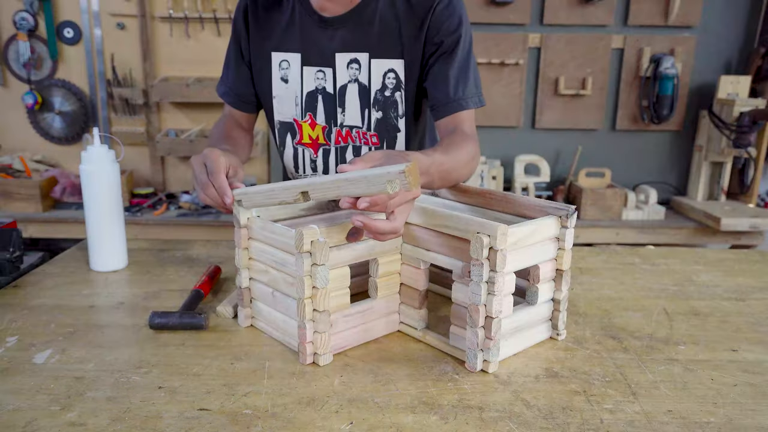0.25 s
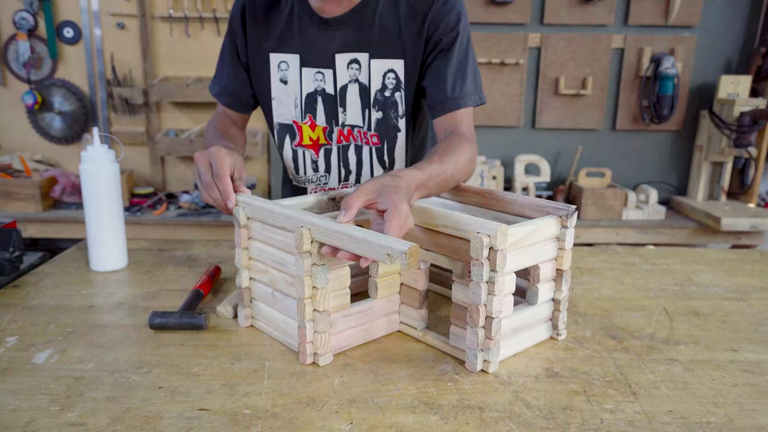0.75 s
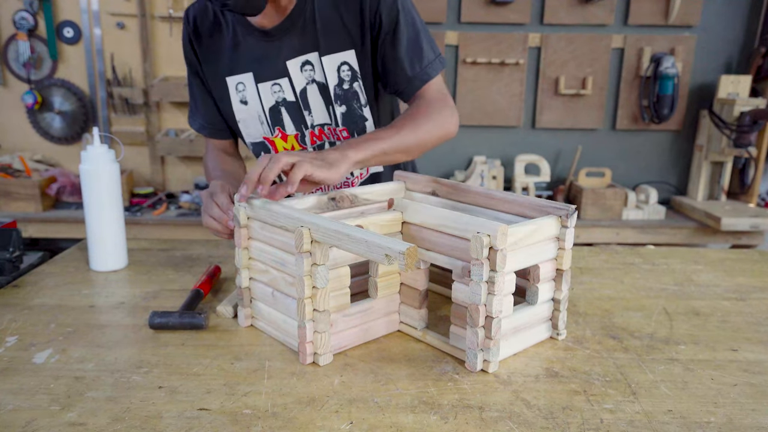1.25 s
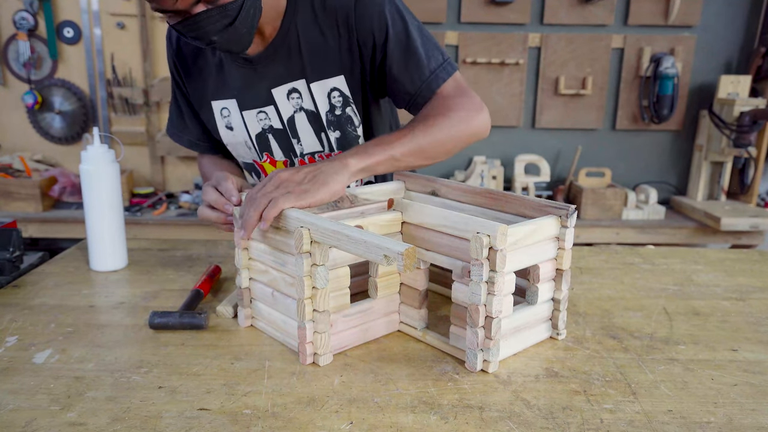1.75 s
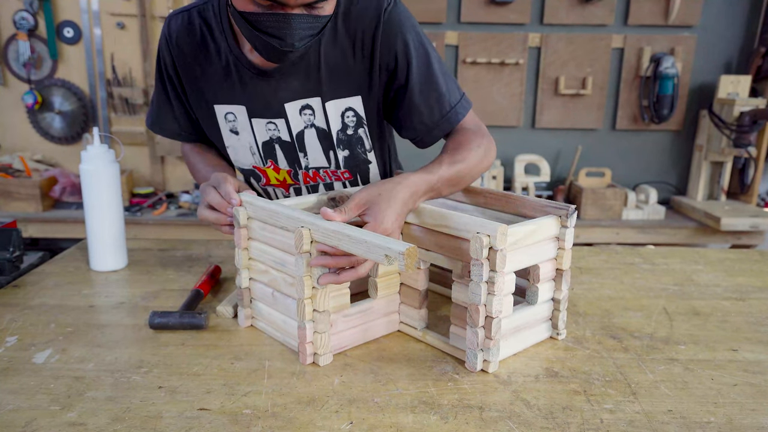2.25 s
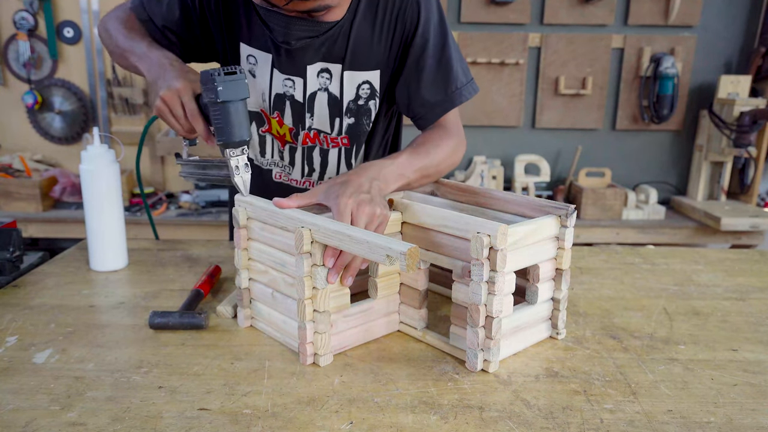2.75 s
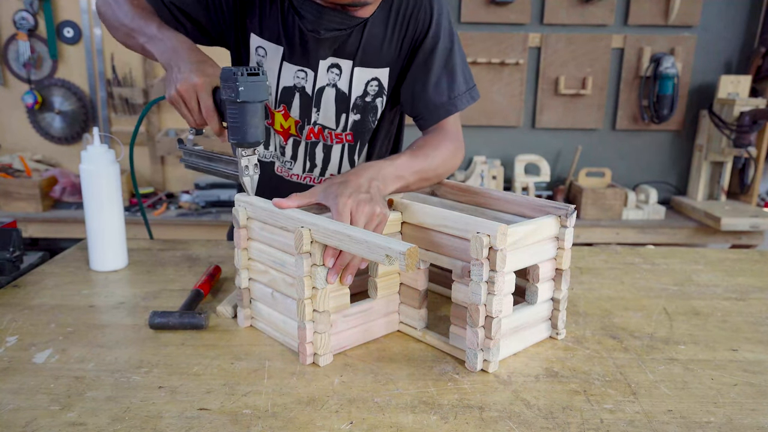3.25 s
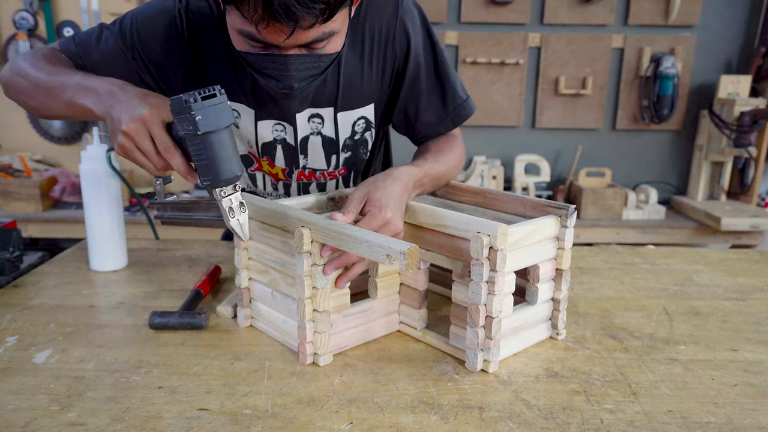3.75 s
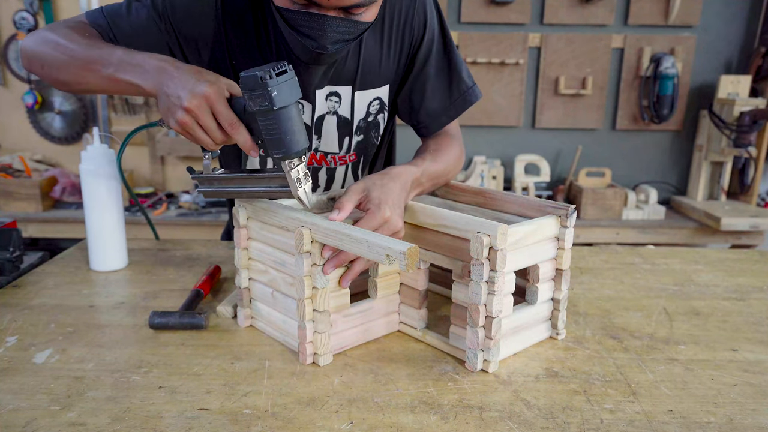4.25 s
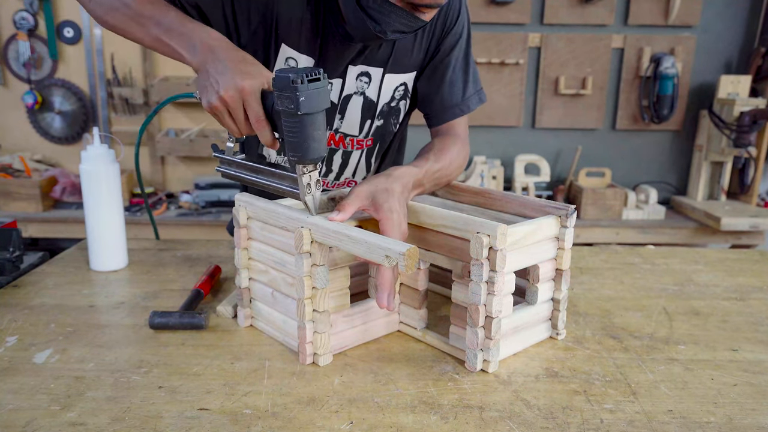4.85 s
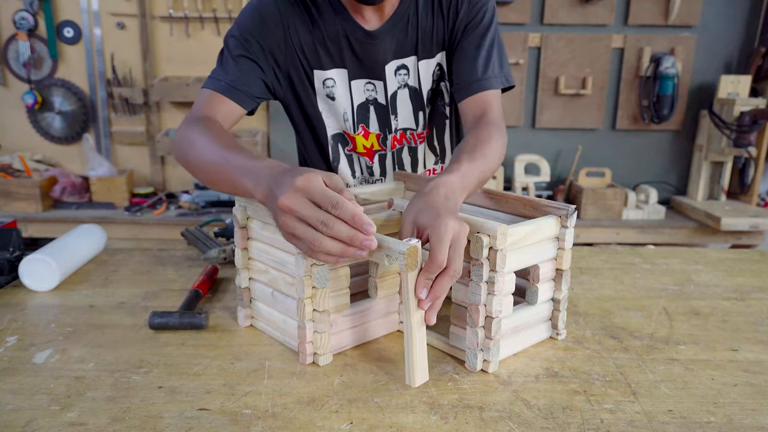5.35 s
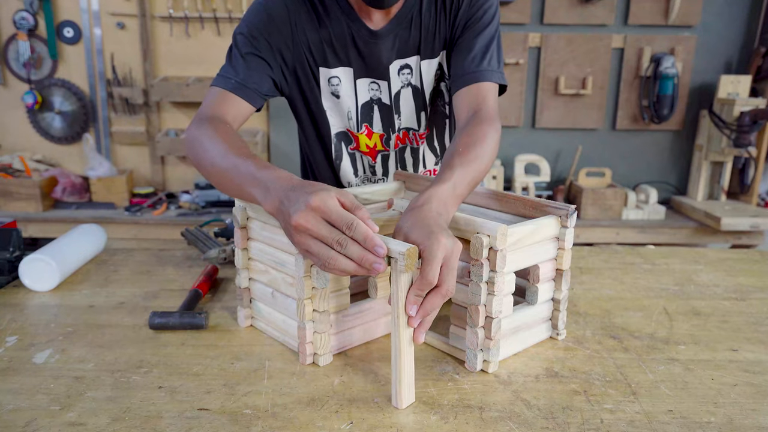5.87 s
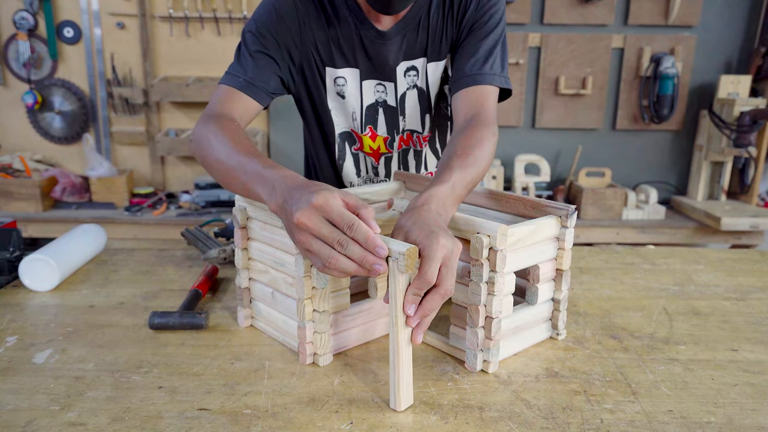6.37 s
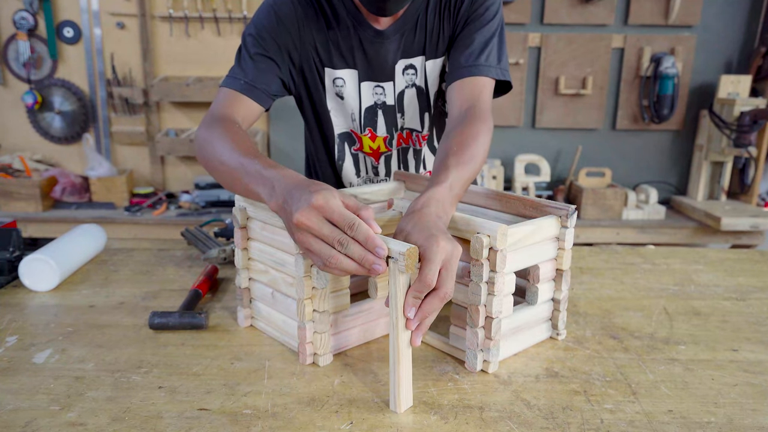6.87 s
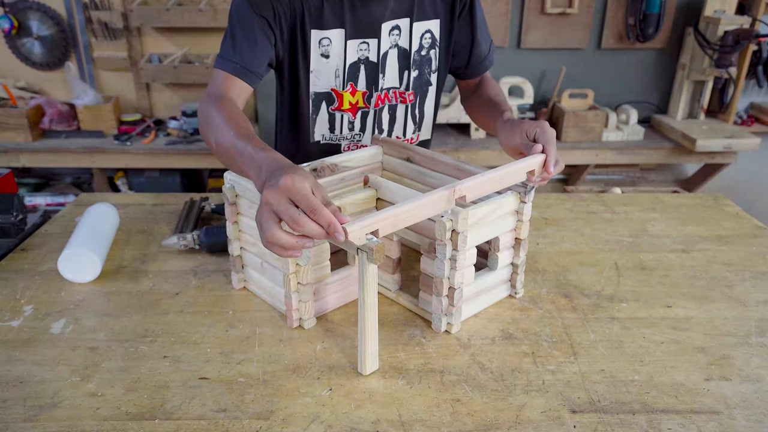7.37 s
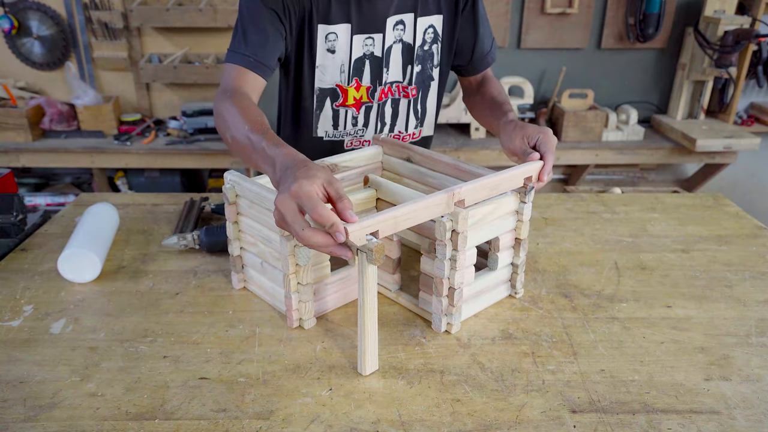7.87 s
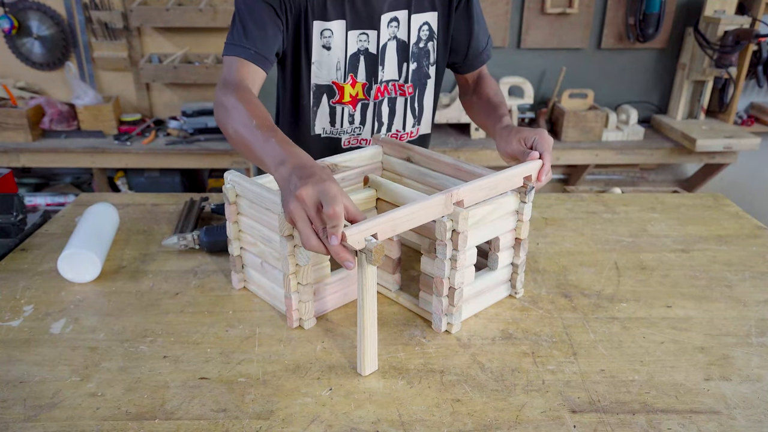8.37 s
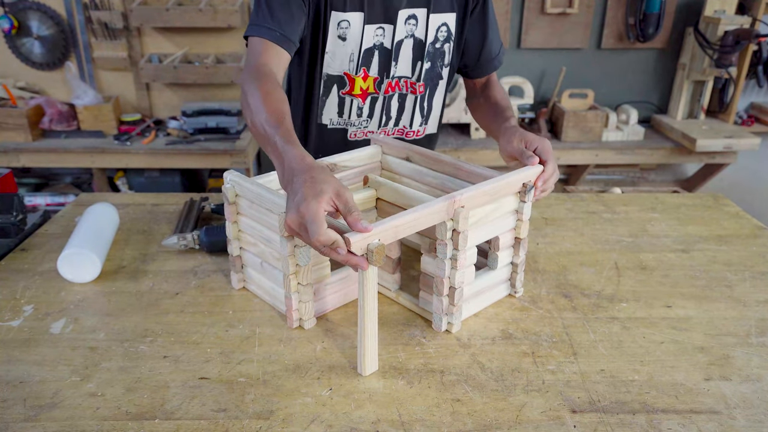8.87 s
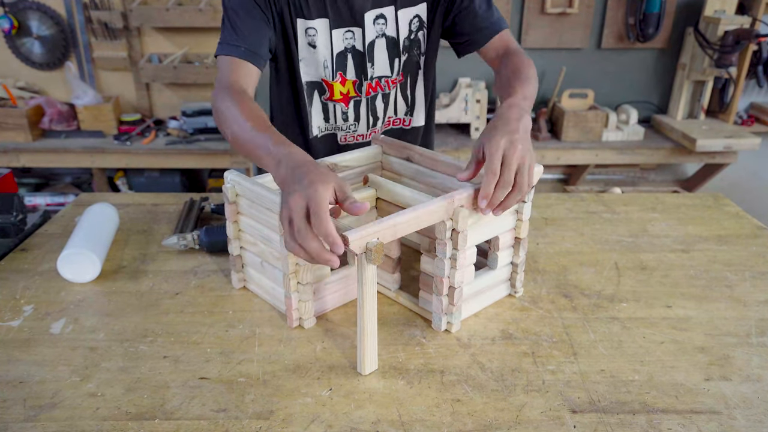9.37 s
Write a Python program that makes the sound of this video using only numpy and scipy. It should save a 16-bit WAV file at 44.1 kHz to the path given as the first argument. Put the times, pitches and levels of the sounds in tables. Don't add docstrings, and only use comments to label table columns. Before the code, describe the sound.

A steady airy machine drone with mains buzz fills a small hard workshop. Wooden sticks tap and rub, and a tight log whistles briefly. An air nailer cracks twice with bursts of air, then twice more until an abrupt scene change. Afterwards come a hard knock, a chattering dropped tool and dry sliding wood. Close, thin-sounding stereo microphone, with the drone dipping after each shot.

```python
import sys
import numpy as np
from scipy import signal
from scipy.fft import rfft, irfft, next_fast_len
from scipy.io import wavfile
from scipy.ndimage import uniform_filter1d, map_coordinates

SR = 44100
rng = np.random.default_rng(int(sys.argv[2]) if len(sys.argv) > 2 else 0)


def file_out(sig):
    cols = np.atleast_2d(sig).T
    lim = np.clip(cols, -1, 1)
    pcm = np.round(lim * 32767).astype(np.int16)
    wavfile.write(sys.argv[1], SR, pcm)


def volts_from_decibels(level):
    exponent = np.asarray(level, float) / 20
    return 10 ** exponent


N = 424241
T = np.arange(N) / SR


def unit(x):
    return x / np.sqrt(np.mean(x ** 2) + 1e-20)


def along(points, hz):
    f, v = np.transpose(points)
    return np.interp(np.log(hz + 1), np.log(f + 1), v)


def wobble(rate):
    knots = rng.standard_normal(int(N * rate / SR) + 4)
    return map_coordinates(knots, [T * rate])


def swells(rows):
    gain = np.zeros(N)
    for s, db, rise, fall in rows:
        distance = np.maximum((s - T) / max(rise, .002), (T - s) / max(fall, .002))
        gain += volts_from_decibels(db - 15 * distance ** 1.3)
    return gain


def filtered(x, response):
    m = next_fast_len(x.shape[-1] + 8192)
    return irfft(rfft(x, m) * response(np.fft.rfftfreq(m, 1 / SR)), m)[..., :x.shape[-1]]


def highpass(hz):
    return lambda f: (1j * f / (1j * f + hz)) ** 2


def resonant(modes):
    def response(f):
        total = 0
        for k, (hz, width, db) in enumerate(modes):
            bandpass = 1j * f * width / (hz * hz - f * f + 1j * f * width)
            total = total + (-1) ** k * volts_from_decibels(db) * bandpass
        return total
    return response


# (frequency [Hz], left-right likeness [0-1])
COHERENCE = [(60, 0.97), (500, 1), (1500, 0.96), (3000, 0.67), (6000, 0.088), (10000, 0.014),
             (15000, 0.065)]


def pair(response, patchy_db, grit_db=0):
    source = rng.standard_normal((2, N)) * volts_from_decibels(grit_db * rng.standard_normal(N))
    z = signal.stft(source, nperseg=256)[2]
    field = uniform_filter1d(rng.standard_normal(z.shape[1:]), size=4, axis=0)
    field = uniform_filter1d(field, size=12, axis=1)
    noise = signal.istft(z * volts_from_decibels(patchy_db * unit(field)), nperseg=256)[1][:, :N]

    def mid_side(f):
        angle = np.arccos(np.clip(along(COHERENCE, f), -1, 1)) / 2
        return response(f) * np.array([np.cos(angle), np.sin(angle)])
    mid, side = filtered(noise, mid_side)
    return unit(np.array([mid + side, mid - side]))


def tones(orders, flutter_db, rate):
    hum_hz, total = 299.7, np.zeros(N)
    for k, db in orders:
        level = volts_from_decibels(db + flutter_db * wobble(rate))
        total += level * np.sin(2 * np.pi * (k * hum_hz * T + rng.random()))
    return unit(total)


# (time [s], depth [dB], return time [s])
DUCKS = [
    (2.925, 6.5, 1.2),
    (3.285, 12, 1.35),
    (4.655, 8.5, 1.7),
    (4.81, 11, 0.19),
    (4.93, 7, 1.2),
    (5.078, 5, 0.43),
    (6.74, 1, 0.34),
]
DIVE_S = 0.047


def ducking():
    gain_db = np.zeros(N)
    for s, depth_db, back_s in DUCKS:
        recovery = np.minimum(((T - s) / back_s) ** 2 - 1, 0)
        gain_db = np.where(T >= s, depth_db * recovery, gain_db)
    return uniform_filter1d(gain_db, size=round(DIVE_S * SR))


# (start [s], hum level [dB], rush level [dB], hiss level [dB])
DRONE = [(0, -54, -45.5, -48.5), (.14, -55.5, -44.5, -50), (5.078, -56, -43, -49.5),
         (7.15, -56.5, -40.5, -44), (8.36, -53.5, -41.5, -45)]
# (frequency [Hz], density [dB per Hz])
RUSH = [(24, -86), (40, -43), (146, -21), (229, -19), (294, -7), (386, -14.5), (530, -11), (593, -2),
        (650, -11.5), (955, -4.5), (1090, -9.5), (2110, -3), (2260, -5), (3720, -4.5), (9000, -14),
        (11700, -20.5), (19800, -120)]
# (frequency [Hz], width [Hz], boost [dB])
DUCTS = [(896, 26, 7.5), (1192, 84, 6.5), (1560, 38, 4.5), (1766, 130, 3), (2600, 95, 2)]
# (frequency [Hz], density [dB per Hz])
HISS = [(3000, -32), (6000, 6.5), (9000, -0.5), (13000, 3), (15000, 3.5), (16000, -8), (16600, -30)]
# (multiple, level [dB])
HUM = [(1, -1.5), (2, -5.5), (3, -16), (5, -7), (7, -3), (8, -2), (11, -25), (13, -4), (14, -5), (15, -4),
       (16, -6), (18, -6)]
# (peak time [s], level [dB], rise [s], fall [s])
BUZZ = [(9.112, -37.5, 0.052, 0.13), (9.48, -42.5, 0.048, .2)]
# (multiple, level [dB])
RATTLE = [(3, -6), (4, 3), (5, 1), (6, 2), (7, -2)]
HUM_DUCKS, HISS_DUCKS = 1.2, 0.81


def drone():
    starts, hum_db, rush_db, hiss_db = np.transpose(DRONE)
    spell = np.clip(np.searchsorted(starts, T, "right") - 1, 0, None)
    duck_db = ducking()
    hum_db = hum_db[spell] + HUM_DUCKS * duck_db
    rush_db = rush_db[spell] + duck_db
    hiss_db = hiss_db[spell] + HISS_DUCKS * duck_db

    motor = volts_from_decibels(-15 + 3 * wobble(10)) * np.sin(2 * np.pi * 265 * T)
    mains = tones(HUM, flutter_db=2, rate=22)
    hum = volts_from_decibels(hum_db + 5 + .8 * wobble(4)) * (mains + motor)

    def ducted(f):
        boost_db = sum(db / (1 + (2 * (f - hz) / width) ** 2) for hz, width, db in DUCTS)
        return volts_from_decibels(along(RUSH, f) + boost_db)
    rush = volts_from_decibels(rush_db + 2 + .6 * wobble(6)) * pair(ducted, patchy_db=.8)
    hiss = volts_from_decibels(hiss_db + 0.96 * wobble(6.1)) * pair(lambda f: volts_from_decibels(along(HISS, f)), patchy_db=1.5)
    rattle = volts_from_decibels(-2) * swells(BUZZ) * tones(RATTLE, flutter_db=3, rate=14)
    return hum + rush + hiss + rattle


# (frequency [Hz], t60 [s])
ROOM = [(300, 0.17), (2000, 0.11), (6000, 0.21), (14000, 0.077)]


def workshop(x):
    hz, t, z = signal.stft(rng.standard_normal((2, SR // 2)), SR, nperseg=256)
    decay = volts_from_decibels(-60 * t / along(ROOM, hz)[:, None])
    tail = signal.istft(z * decay, SR, nperseg=256)[1]
    delayed = np.pad(x.mean(0), (200, 0))[None]
    return signal.fftconvolve(delayed, tail / np.linalg.norm(tail[0]), axes=1)[:, :N]


# (start [s], end [s], first pitch [Hz], last pitch [Hz], level [dB])
SQUEALS = [(.24, .3, 3950, 4050, -47), (4.435, 4.47, 4680, 4600, -48), (4.53, 4.59, 4100, 4250, -46),
           (6.98, 7.03, 3900, 4000, -41), (6.98, 7.05, 4600, 4750, -40), (6.985, 7.02, 5300, 5500, -40),
           (6.99, 7.03, 3300, 3400, -44), (7.065, 7.12, 5700, 6300, -41), (7.07, 7.13, 4700, 5200, -45)]


def squeals():
    out = np.zeros(N)
    for start, end, from_hz, to_hz, db in SQUEALS:
        u = np.clip((T - start) / (end - start), 0, 1)
        hz = from_hz + (to_hz - from_hz) * u + 50 * wobble(200)
        slips = volts_from_decibels(db - 3 + 3.5 * wobble(150)) * np.sin(np.pi * u) ** .5
        out += slips * np.sin(2 * np.pi * np.cumsum(hz) / SR)
    return out


# (peak time [s], level [dB], rise [s], fall [s], brightness [dB])
RUBS = [(.5, -48.5, 0.11, 0.11, -6), (1.8, -53, .06, 0.34, 6), (2.835, -41.5, .02, 0.084, 1),
        (5.13, -53.5, 0.038, 0.046, 8.5), (5.27, -49.5, 0.067, 0.052, 2), (5.48, -37, 0.0039, 0.033, -2),
        (7.0, -48, 0.05, 0.21, -6), (7.75, -45.5, 0.029, 0.12, 2), (7.92, -43.5, 0.17, 0.048, 7),
        (7.968, -37, 0.0048, 0.041, 0), (8.08, -45, 0.043, 0.038, 0), (8.152, -38.5, .03, .04, 2.5),
        (8.238, -34.5, 0.026, 0.052, 6), (8.308, -31, 0.03, 0.033, 8), (8.382, -31, 0.045, 0.043, 3.5),
        (8.735, -25.5, 0.032, 0.053, 1.5), (8.862, -22, 0.013, 0.069, -3), (9.285, -41.5, .04, 0.044, 4),
        (9.33, -32, 0.014, 0.084, -0.5), (9.394, -36.5, .02, 0.062, 5), (9.44, -41.5, .09, .09, -7),
        (9.486, -34, 0.048, 0.055, 4.5), (9.527, -31, 0.014, 0.055, -1)]
# (frequency [Hz], width [Hz], level [dB])
GRAIN = [
    [(3720, 720, -1), (5140, 1370, 1.5)],
    [(6770, 1100, 0), (8480, 1400, 0)],
    [(10000, 3100, 0), (14900, 2700, 0)],
]
LOW_DB, LOW_GROWS, LOW_DULLS = -49, 0.73, 0.51


def rubbing():
    low, middle, high = [], [], []
    for s, db, rise, fall, bright_db in RUBS:
        low_db = LOW_DB + LOW_GROWS * (db + 50) - LOW_DULLS * bright_db
        low.append((s, low_db, rise / LOW_GROWS, fall / LOW_GROWS))
        middle.append((s, db, rise, fall))
        high.append((s, db + bright_db, rise, fall))
    slide = np.zeros((2, N))
    for strokes, modes in zip((low, middle, high), GRAIN):
        slide += swells(strokes) * pair(resonant(modes), patchy_db=2, grit_db=3)
    return volts_from_decibels(1.3 * wobble(60)) * slide * volts_from_decibels([[.7], [-.7]])


# (peak time [s], level [dB], rise [s], fall [s])
SQUEAK = [
    [(.97, -37, 0.027, .06), (1.085, -36.5, .06, 0.063)],
    [(.96, -48, .01, .03), (1.025, -47.5, .05, 0.11)],
    [(.962, -39, .015, 0.074)],
    [(.995, -35.5, 0.023, .04), (1.086, -31.5, .02, .055)],
]
# (frequency [Hz], width [Hz], level [dB])
WHISTLE = [(3470, 16, 0), (2690, 100, 4.5), (4390, 27, -4)]
# (frequency [Hz], width [Hz], level [dB])
CHIRP = [(13200, 340, -13), (14300, 1000, 9)]


def squeak():
    whistle = np.zeros(N)
    for rows, mode in zip(SQUEAK, WHISTLE):
        tone = unit(filtered(rng.standard_normal(N), resonant([mode])))
        whistle += swells(rows) * volts_from_decibels(mode[2]) * tone
    chirp = pair(lambda f: resonant(CHIRP)(f) ** 1.2, patchy_db=2.5)
    return whistle + swells(SQUEAK[-1]) * chirp


# (frequency [Hz], width [Hz], level [dB])
CLATTER = [(2080, 200, -11), (3580, 130, -5), (4870, 40, -3), (4980, 25, 6), (7480, 120, -9),
           (7990, 80, -8), (9080, 90, -4), (9280, 90, -3), (9550, 60, -8)]
DROP_S, DROP_DB, DROP_T60 = 7.161, -20, 0.12


def dropped_tool():
    decay_db = -60 * ((T - DROP_S) / DROP_T60) ** 2 + 1.2 * wobble(150)
    hits = rng.standard_normal((2, N)) + rng.standard_normal(N)
    ring = filtered((T >= DROP_S) * volts_from_decibels(decay_db) * hits, resonant(CLATTER))
    return volts_from_decibels(DROP_DB + 12.0) * ring / np.abs(ring).max()


# (time [s], blow peak [dB], ring [Hz], t60 [s])
KNOCKS = [(.07, -33.5, 1110, 0.1), (.125, -32, 1590, .08), (.382, -30.5, 1560, 0.12),
          (.481, -34, 970, 0.066), (2.044, -34, 580, .06), (2.45, -29, 2070, .12), (2.53, -28.5, 3580, 0.2),
          (2.7465, -29, 560, 0.23), (2.7495, -25.5, 890, 0.073), (2.771, -25.5, 1210, .05),
          (3.1071, -24.5, 1190, 0.1), (3.1075, -36, 537, .16), (3.626, -44, 2100, .05),
          (4.208, -44, 500, .05), (4.3758, -27.5, 1520, 0.067), (4.376, -32.5, 527, 0.11),
          (4.3755, -34, 4500, .05), (4.489, -39, 510, 0.032), (5.476, -32, 7000, 0.065),
          (5.59, -29, 1630, 0.074), (6.735, -13, 2440, 0.091), (6.734, -19.5, 1260, 0.15),
          (7.274, -16.5, 3750, 0.18), (7.274, -27, 7450, .087), (8.352, -29.5, 650, 0.088),
          (8.638, -23, 1300, 0.15), (8.639, -31.5, 567, 0.17), (8.852, -20, 1970, .1)]
# (time [s], blow peak [dB], ring [Hz], t60 [s])
TICKS = [(2.0428, -15, 4500, .18), (2.276, -20.5, 5450, 0.14), (6.734, -37, 8950, .04),
         (8.6205, -17.5, 9000, .03), (8.823, -17, 10000, .04)]
# (time [s], blow peak [dB], ring [Hz], width [Hz], t60 [s])
SCUFFS = [(7.144, -26.5, 5000, 9800, .33), (7.1605, -13, 4400, 5200, .24), (7.16, -21, 1450, 1400, 0.12),
          (7.1605, -13.5, 9200, 4400, 0.31), (7.267, -14.5, 2850, 2200, 0.22),
          (7.292, -20, 2560, 2700, 0.13), (7.266, -26.5, 860, 710, 0.13), (7.274, -23.5, 5230, 150, 0.13),
          (7.42, -30, 1990, 4200, 0.23), (7.33, -33.5, 770, 500, 0.29), (7.165, -21.5, 4985, 60, .3),
          (1.1, -34, 6600, 1800, 0.045), (8.4, -31, 2500, 4600, .25), (7.968, -29, 3400, 2500, 0.074),
          (8.63, -26, 8000, 9800, .036), (8.852, -16, 4300, 3700, 0.15)]
KNOCK_DB, TICK_DB, SCUFF_DB = -10, -18, -3.5
WIDTH_HZ, WIDENS = 710, 1.27


def contacts():
    rows = []
    for table, chatter_db in ((KNOCKS, KNOCK_DB), (TICKS, TICK_DB)):
        for s, db, hz, t60 in table:
            rows.append((s, db, hz, WIDTH_HZ * (hz / 1000) ** WIDENS, chatter_db, t60))
    for s, db, hz, width_hz, t60 in SCUFFS:
        rows.append((s, db, hz, width_hz, SCUFF_DB, t60))
    return rows


def sticks():
    out, t = np.zeros((2, N + SR)), np.arange(SR // 3) / SR
    for s, db, hz, width_hz, chatter_db, t60 in contacts():
        piece = lambda f: resonant([(hz, width_hz, 0)])(f) ** 2
        grit = volts_from_decibels(5 * rng.standard_normal(len(t))) * rng.standard_normal((2, len(t)))
        blow, mid, side = filtered(np.array([t == 0, *grit]), piece)
        side *= np.clip(hz / 9000, 0, 1)
        chatter = unit(np.array([mid + side, mid - side])) * np.minimum(t / 0.0014, 1)
        chatter *= volts_from_decibels(chatter_db - 60 * t / np.clip(t60, .01, 1))
        out[:, round(s * SR):][:, :len(t)] += volts_from_decibels(db) * (blow / np.abs(blow).max() + chatter)
    return (out[:, :N] + dropped_tool()) * volts_from_decibels([[.6], [-.6]])


# (time [s], hiss level [dB])
VALVES = [
    (2.909, -19),
    (3.268, -18.5),
    (4.640, -22),
    (4.917, -22),
]
# (frequency [Hz], density [dB per Hz])
VALVE = [(880, -61), (1500, -27), (2100, -35), (3920, -18), (7320, -24), (11900, -4), (16000, -8.5)]
# (time [s], peak level [dB])
DRIVER = [
    (2.9232, -5),
    (2.9575, -8),
    (3.2805, -6.5),
    (3.3256, -10),
    (4.6518, -5),
    (4.9278, -6),
]
# (strike [s], body ring [dB], exhaust level [dB], exhaust open [s], thud in the house [dB])
BLAST = [
    (2.924, -30, -25.5, 0.065, -30.5),
    (3.281, -20.5, -29.5, 0.073, -29.5),
    (4.651, -17.5, -35, .078, -37.5),
    (4.928, -20, -34, .3, -38.5),
]
# (frequency [Hz], width [Hz], level [dB])
BODY = [(5430, 110, 2.5), (4660, 1900, -6), (5870, 1170, -3.5)]
# (frequency [Hz], width [Hz], level [dB])
TOP = [(7900, 9500, -5.3), (10530, 880, 2.5), (13500, 2100, -8.5)]
# (frequency [Hz], width [Hz], level [dB])
HOUSE = [(650, 180, -10.5), (1184, 170, 1.5), (1760, 2660, -9.5), (2730, 1100, -8)]
RING_DB_S, THUD_DB_S, JET_DB_S, CLOSE_DB_S = 422, 419.5, 150, 305
JET_DB, JET_HOLD_S, JET_CLOSES = -22, 0.035, .7
HOUSE_DB = -14.5
CUT_S = 5.078


def nailer():
    valve, cracks = np.zeros(N), np.zeros(N)
    body, top, house = np.zeros((3, N))
    for s, db in VALVES:
        valve += (T >= s) * (T < s + .02) * volts_from_decibels(db + 4.5 - 700 * np.abs(T - s - .004))
    for s, db in DRIVER:
        cracks[round(s * SR)] = volts_from_decibels(db)
    for s, ring_db, exhaust_db, open_s, thud_db in BLAST:
        t = np.maximum(T - s, 0)
        flow = (T >= s) * (T < CUT_S) * volts_from_decibels(-CLOSE_DB_S * np.maximum(t - open_s, 0))
        body += flow * np.hypot(volts_from_decibels(ring_db - RING_DB_S * t), volts_from_decibels(exhaust_db))
        top += flow ** JET_CLOSES * volts_from_decibels(JET_DB - JET_DB_S * np.maximum(t - JET_HOLD_S, 0))
        house += flow * np.hypot(volts_from_decibels(thud_db - THUD_DB_S * t), volts_from_decibels(exhaust_db + HOUSE_DB))
    air = body * pair(resonant(BODY), patchy_db=1.5, grit_db=3.5)
    air += top * pair(resonant(TOP), patchy_db=1.5, grit_db=3)
    air += house * pair(resonant(HOUSE), patchy_db=1.2)
    air = filtered(air, highpass(350))
    crack = filtered(cracks, lambda f: resonant([(4500, 9000, 5)])(f) ** 2)
    hiss = valve * pair(lambda f: volts_from_decibels(along(VALVE, f)), patchy_db=-5.0)
    return (air + crack + hiss) * volts_from_decibels([[.6], [-.6]])


def scene():
    wood = filtered(sticks(), highpass(200))
    reverberant = volts_from_decibels(-15.0) * workshop(wood)
    return drone() + reverberant + squeals() + rubbing() + squeak() + wood + nailer()


def top_cut(x):
    return signal.sosfilt(signal.butter(12, 16990, fs=SR, output="sos"), x)


def record(dry):
    thin = filtered(dry, lambda f: highpass(110)(f) * np.where(f < 16000, 1, volts_from_decibels(-51)))
    held = thin / (1 + np.abs(thin / .8) ** 4) ** .25
    return top_cut(held)


dry = scene()
out = record(dry)
file_out(out)
```